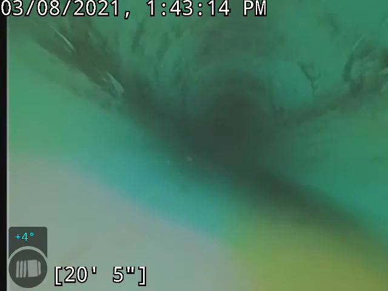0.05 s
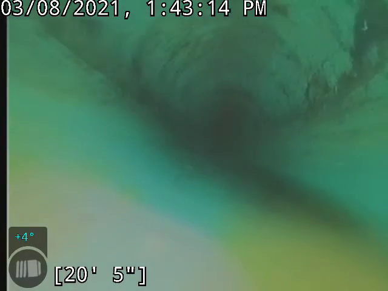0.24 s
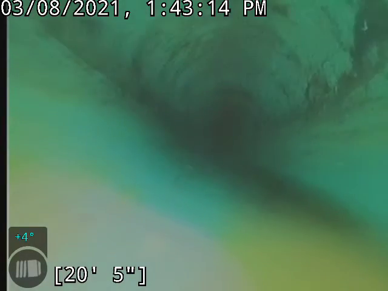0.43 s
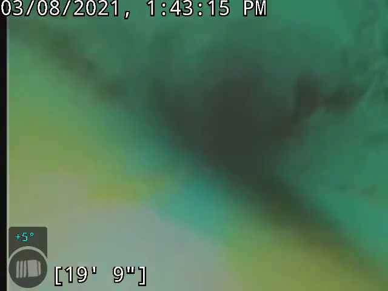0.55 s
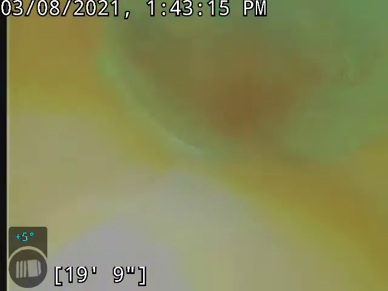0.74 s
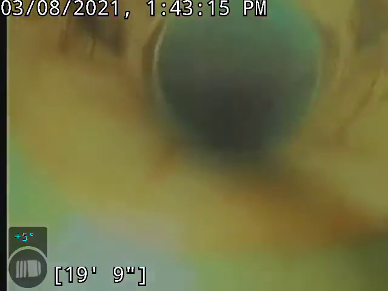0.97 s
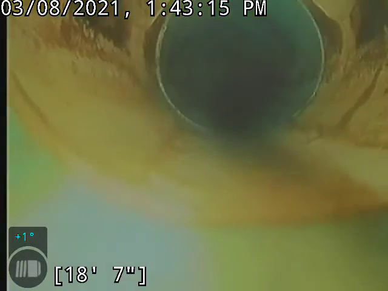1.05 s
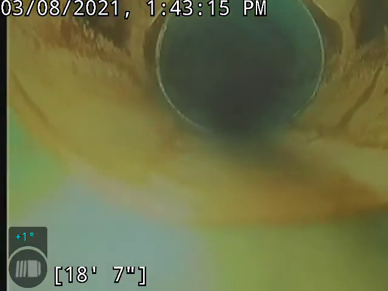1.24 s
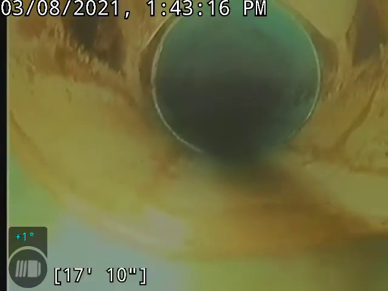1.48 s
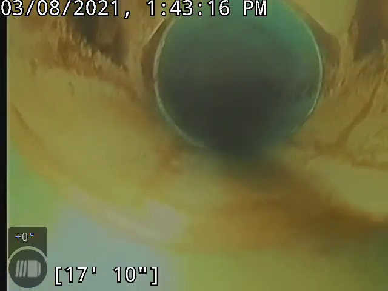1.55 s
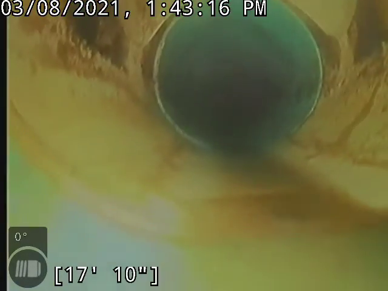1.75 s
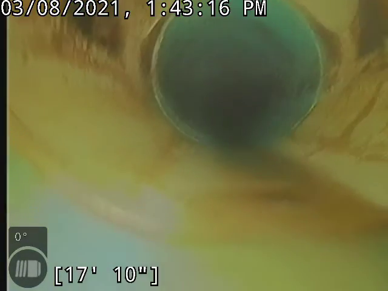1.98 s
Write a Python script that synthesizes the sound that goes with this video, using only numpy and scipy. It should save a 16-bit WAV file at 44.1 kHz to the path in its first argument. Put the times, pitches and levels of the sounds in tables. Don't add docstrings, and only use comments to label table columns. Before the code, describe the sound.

A stiff drain cable is hauled back and coiled into a hollow reel, close in a small hard room. Low jolts, light rattle and taps run over a faint deep hum; a glove hiss swells at 0.3-0.5 s. Coils knock at 0.49 s, hard, and 0.89 s, duller, then slap heavily with clattering rebounds at 1.28 and 1.69 s. A soft thud at 1.8 s, then movement fades towards 2 s.

```python
import sys
import numpy as np
from scipy import signal
from scipy.fft import rfft, irfft, next_fast_len
from scipy.io import wavfile
from scipy.ndimage import uniform_filter1d, map_coordinates

SR = 44100
rng = np.random.default_rng(int(sys.argv[2]) if len(sys.argv) > 2 else 0)


def wav_out(sig):
    wavfile.write(sys.argv[1], SR, np.round(np.clip(np.atleast_2d(sig).T, -1, 1) * 32767).astype(np.int16))


def makeup_ratio(level_db):
    decades = np.asarray(level_db, float) / 20
    return 10 ** decades


N = 88817

# time_s, level_db
SLIDE = [(0, -67), (.265, -65), (.3, -47), (.43, -42.5), (.47, -50), (.52, -49), (.58, -57), (.85, -57.5),
         (.93, -61.5), (1.04, -56), (1.16, -66.5), (1.26, -65), (1.31, -55.5), (1.55, -57.5), (1.72, -59.5),
         (1.85, -63), (1.92, -75.5), (2.01, -82)]
# freq_hz, density_db (per Hz)
HISS = [(5000, -40), (7000, -16), (8900, -4.5), (10500, -2), (12300, 1), (13800, -0.5)]
# freq_hz, density_db (per Hz)
RUB = [(900, -27), (1500, 2), (3200, -9), (5300, -4.5), (7000, -9.5), (9000, -21)]
# time_s, jolt_db, rattle_db
REEL = [(0, -41.5, -51.5), (.12, -51.5, -56.5), (.25, -47.5, -58), (.3, -46.5, -64.5), (.42, -46.5, -54),
        (.53, -48, -52.5), (.6, -43.5, -53), (.72, -46, -53), (.86, -48, -57), (.95, -42.5, -53.5),
        (1.05, -47.5, -52), (1.12, -52, -61), (1.26, -51, -57), (1.42, -57.5, -82), (1.62, -55.5, -67),
        (1.76, -49, -62), (1.9, -52.5, -65), (2.01, -58, -79)]
# freq_hz, width_hz, level_db
JOLT_PEAKS = [(83.6, 27.7, 0.5), (128.3, 46, 0), (197.6, 20.6, -5.5), (269, 109, -8.5), (424, 170, -13)]
# freq_hz, width_hz, level_db
RATTLE_PEAKS = [(437, 89, -5.5), (745, 73, 0), (911, 48, 0), (1078, 71, -6), (1500, 397, -14.5),
                (2550, 770, -18.5), (5200, 2600, -32)]
# start_s, peak_db, thud_db (over peak), crack_db (over peak), panel_hz
KNOCKS = [
    (0.4872, -28.5, 1.5, -3.5, 1710),
    (0.8946, -29, -4.5, -35, 945),
    (1.2794, -23, -21, -13, 885),
    (1.6873, -24, -13, -9.5, 683),
    (1.7987, -42, -13, -34, 800),
]
# start_s, peak_db, thud_db (over peak), panel_hz
REBOUNDS = [(0.4896, -22.5, -23.5, 803), (0.4993, -28.5, -3, 740), (.527, -43, -27, 860),
            (.535, -36.5, -26, 1090), (.903, -37, 7, 820), (.927, -38, -12, 900), (1.2815, -28.5, -16, 914),
            (1.2857, -25.5, -14, 1044), (1.291, -29, -20, 1294), (1.299, -27.5, -29, 368),
            (1.307, -32, -30, 494), (1.321, -33, -15, 470), (1.3225, -39.5, -36, 1500),
            (1.329, -34, -12, 513), (1.345, -39, -19, 447), (1.678, -40, -6, 800), (1.692, -24.5, -14, 702),
            (1.701, -26, -8.5, 726), (1.704, -32, -22, 930), (1.715, -25.5, -28, 422),
            (1.727, -44, -14, 653), (1.739, -47, -21, 760), (1.752, -38.5, -15, 690),
            (1.817, -41, -28, 690)]
# start_s, peak_db, thud_db (over peak), crack_db (over peak), panel_hz
TAPS = [(0.016, -41, -26, -20, 1230), (0.084, -37, -31, -39, 765), (0.311, -51, 10.5, -26, 822),
        (0.438, -37.5, 1, -14, 810), (0.739, -37.5, -16, -37, 810), (0.802, -47.5, -4, -0.5, 815),
        (0.978, -42.5, 4.5, -23, 810), (1.052, -47.5, 7.5, 10, 810), (1.062, -46, -26, 2, 780),
        (1.188, -42.5, -14, -40, 960), (1.245, -48, -22, -30, 930), (1.595, -49.5, 2.5, -3, 830),
        (1.663, -51, -11, -26, 830)]
# start_s, level_db
TICKS = [
    (1.0532, -41),
    (1.2793, -33.5),
    (1.688, -44.5),
]
# freq_hz, level_db, t60_s
SHELL = [(470, -4.5, 0.025), (685, -3, 0.025), (964, 5, 0.012), (1308, -4, 0.014), (1690, -3.5, 0.023),
         (2060, -16, 0.026), (2611, -14, 0.039), (3570, -24, 0.015)]
# freq_hz, level_db, t60_s
FRAME = [(130, -10, 0.11), (180.6, 0, 0.13), (260, -3.5, 0.054), (321.3, 1.5, 0.09), (403, -4, 0.033)]
# freq_hz, density_db (per Hz)
CRACK = [(1500, 9), (2500, 5), (4500, 1), (6500, -10), (8500, -55)]
# freq_hz, width_hz, level_db
SCRAPE_PEAKS = [(254, 50, 4.5), (442, 257, 2), (800, 780, -7.5), (1500, 230, -6.5), (2400, 320, -13),
                (4860, 3400, -29.5)]
# start_s, peak_db, pitch_hz
THUMPS = [(0.012, -40, 230), (0.161, -42, 115), (0.2, -46, 297), (0.229, -41, 79), (0.303, -31, 106.3),
          (0.364, -33, 100), (0.4911, -30, 258), (0.506, -36, 240), (0.529, -36, 192), (0.573, -31.5, 130),
          (0.599, -28, 142), (0.675, -42, 99), (0.741, -28.5, 432), (0.802, -40.5, 101), (.904, -32, 200),
          (.919, -28.5, 193), (0.94, -32, 102), (1.031, -38, 107), (1.065, -30.5, 165), (1.187, -36, 400),
          (1.205, -37.5, 307), (1.279, -23.5, 345), (1.287, -24, 455), (1.296, -29, 296), (1.664, -32, 317),
          (1.689, -22, 302), (1.697, -26.5, 193), (1.727, -26, 296), (1.737, -33, 190), (1.772, -39, 290),
          (1.799, -27.5, 340), (1.8048, -23.5, 169.7), (1.805, -23.5, 310), (1.817, -32, 260),
          (1.834, -35.5, 130), (1.864, -42, 120.6), (1.88, -41, 188), (1.93, -41, 181), (1.97, -42, 175)]
# freq_hz, t60_s
ROOM = [(200, 0.28), (1000, 0.28), (3000, 0.43), (10000, 0.31)]
# freq_hz, density_db (per Hz)
HUM = [(12, -35), (20, 3), (80, -3), (113, -31), (157, -3), (260, -22.5), (561, -31.5), (2000, -40.5),
       (2600, -112), (4400, -120)]

RUB_DB, RUB_GROWS = -12.5, 0.69
JOLTS_PER_S, JOLT_SPREAD_DB = 300, 2
RATTLES_PER_S, RATTLE_SPREAD_DB = 1500, -0.5
SHELL_DB, PANEL_DB, PANEL_T60_S = -6, 5, 0.03
THUD_DB, THUD_LAG_S = -5, 0.00553
CRACK_DB, CRACK_T60_S = 1.5, 0.017
CHATTER_S, CHATTER_DB = 0.005006, -1.5
REBOUND_SHELL_DB, REBOUND_CRACK_DB = -4.5, -18
SCRAPE_DB, SCRAPE_T60_S = -14, 0.2
TAP_DB, TAP_SPREAD_S, TICK_T60_S = -1, 0.011, 0.022
THUMP_CYCLES, THUMP_ATTACK_S = 10.4, 0.0032
ROOM_DB, HUM_DB = -10, -52.5
LIMIT, KNEE = 0.09, 4
NOTCH_HZ, NOTCH_WIDTH_HZ, NOTCH_DEPTH = 7980, 1010, 0.51
TOP_HZ = 13900


def unit(x):
    return x / np.sqrt(np.mean(x ** 2) + 1e-20)


def along(points, hz):
    f, v = np.transpose(points)
    return np.interp(np.log(hz + 1), np.log(f + 1), v)


def curves(rows):
    s, *cols = np.transpose(rows)
    return [np.interp(np.arange(N) / SR, s, c) for c in cols]


def wobble(rate):
    knots = rng.standard_normal(int(N * rate / SR) + 4)
    return map_coordinates(knots, [np.arange(N) * rate / SR])


def filtered(x, response):
    m = next_fast_len(len(x) + SR // 2)
    return irfft(rfft(x, m) * response(np.fft.rfftfreq(m, 1 / SR)), m)[:len(x)]


def rush(spectrum, patchy_db):
    z = signal.stft(rng.standard_normal(N), nperseg=256)[2]
    field = uniform_filter1d(rng.standard_normal(z.shape), 8, 0)
    field = uniform_filter1d(field, 8, 1)
    x = signal.istft(z * makeup_ratio(patchy_db * unit(field)), nperseg=256)[1][:N]
    return unit(filtered(x, lambda hz: makeup_ratio(along(spectrum, hz))))


def puff(spectrum, t, t60):
    noise = filtered(rng.standard_normal(len(t)), lambda hz: makeup_ratio(along(spectrum, hz)))
    return unit(noise) * makeup_ratio(-60 * t / t60)


def shaken(peaks, rate, spread_db):
    chance, size, sign = rng.random((3, N))
    hits = (chance < rate / SR) * makeup_ratio(-spread_db * np.log(size + 1e-9)) * np.sign(sign - 0.5)

    def body(f):
        total = 0
        for k, (centre, width, db) in enumerate(peaks):
            band = 1j * f * width
            total = total + (-1) ** k * makeup_ratio(db) * band / (centre ** 2 - f * f + band)
        return total

    return unit(filtered(hits, body))


def ring(modes, t, attack_s, detune):
    swing = rng.standard_normal((len(modes), 2))
    tones = 0
    for k, (hz, db, t60) in enumerate(modes):
        level = makeup_ratio(db + 2 * swing[k, 0] - 60 * t / t60)
        pitch_hz = hz * (1 + detune * swing[k, 1])
        tones = tones + (-1) ** k * level * np.sin(2 * np.pi * pitch_hz * t)
    return tones * (1 - np.exp(-t / attack_s))


def glove():
    level_db, = curves(SLIDE)
    hiss = makeup_ratio(level_db + 0.4 * wobble(14)) * rush(HISS, patchy_db=1.2)
    mean_db = level_db.mean()
    rub_db = mean_db + RUB_GROWS * (level_db - mean_db) + RUB_DB
    return hiss + makeup_ratio(rub_db) * rush(RUB, patchy_db=1.5)


def reel():
    jolt_db, rattle_db = curves(REEL)
    lumps = wobble(22.76)
    jolts = makeup_ratio(jolt_db + 1.36 * lumps) * shaken(JOLT_PEAKS, JOLTS_PER_S, JOLT_SPREAD_DB)
    rattle_gain = makeup_ratio(rattle_db + 2.2 * lumps + 0.67 * wobble(29.8))
    return jolts + rattle_gain * shaken(RATTLE_PEAKS, RATTLES_PER_S, RATTLE_SPREAD_DB)


def blow(db, thud_db, crack_db, contacts, panel_hz):
    t = np.arange(SR // 4) / SR

    def late(x, s):
        return np.pad(x, (round(max(s, 0) * SR), 0))[:len(t)]

    shell = sum(late(makeup_ratio(level) * ring(SHELL, t, 0.0006, detune=0.035), s) for s, level in contacts)
    panel = makeup_ratio(PANEL_DB - 60 * t / PANEL_T60_S) * np.sin(2 * np.pi * panel_hz * t)
    shell = shell + panel * (1 - np.exp(-t / 0.00067))
    thud = late(ring(FRAME, t, 0.0025, detune=0.046), THUD_LAG_S)
    crack = puff(CRACK, t, CRACK_T60_S) * (1 - np.exp(-t / 0.00055))
    mix = makeup_ratio(SHELL_DB) * shell + makeup_ratio(THUD_DB + thud_db) * thud + makeup_ratio(CRACK_DB + crack_db) * crack
    return makeup_ratio(db) * mix


def knocks():
    out, rubbing = np.zeros(N + SR), np.zeros(N + SR)
    t = np.arange(SR // 4) / SR
    sounds = []
    for s, db, thud_db, hz in REBOUNDS:
        sounds.append((s, blow(db, thud_db, REBOUND_CRACK_DB, [(0.0015, REBOUND_SHELL_DB)], hz)))
    for s, db in TICKS:
        sounds.append((s, makeup_ratio(db) * puff(HISS, t, TICK_T60_S)))
    for s, db, thud_db, crack_db, hz in KNOCKS:
        contacts = [(0, 0), (CHATTER_S * rng.random(), CHATTER_DB)]
        sounds.append((s, blow(db, thud_db, crack_db, contacts, hz)))
        rubbing[round(s * SR):][:len(t)] += makeup_ratio(db + SCRAPE_DB - 60 * t / SCRAPE_T60_S)
    for s, db, thud_db, crack_db, hz in TAPS:
        contacts = [(0.0013, 0)] + [(TAP_SPREAD_S * u, -4) for u in rng.random(3)]
        sounds.append((s, blow(db + TAP_DB, thud_db, crack_db, contacts, hz)))
    for s, x in sounds:
        out[round(s * SR):][:len(x)] += x
    return out[:N] + rubbing[:N] * shaken(SCRAPE_PEAKS, RATTLES_PER_S, RATTLE_SPREAD_DB)


def thumps():
    out, t = np.zeros(N + SR), np.arange(SR // 4) / SR
    for s, db, hz in THUMPS:
        tone = ring([(hz, db, THUMP_CYCLES / hz)], t, THUMP_ATTACK_S, detune=0)
        out[round(s * SR):][:len(t)] += tone
    return out[:N]


def room(x):
    out, step = np.zeros(N + 2 * SR), SR // 3
    for start in range(0, N, step):
        hz, t, z = signal.stft(rng.standard_normal(SR // 2), SR, nperseg=256)
        fade = makeup_ratio(-60 * t / along(ROOM, hz)[:, None])
        tail = signal.istft(z * fade, SR, nperseg=256)[1]
        wet = signal.fftconvolve(x[start:start + step], tail / np.linalg.norm(tail))
        out[start + 200:][:len(wet)] += wet
    return out[:N]


def hum():
    return makeup_ratio(HUM_DB + 1.2 * wobble(6)) * rush(HUM, patchy_db=1.1)


def scene():
    hits = knocks() + thumps()
    return (hits + makeup_ratio(ROOM_DB) * room(hits) + reel() + glove() + hum())[None]


def top_cut(x):
    return signal.sosfilt(signal.butter(12, 14000, fs=SR, output="sos"), x)


def record(dry):
    def treble_dip(hz):
        dip = NOTCH_DEPTH * np.exp(-((hz - NOTCH_HZ) / NOTCH_WIDTH_HZ) ** 2)
        return (1 - dip) * (hz < TOP_HZ)

    limited = dry[0] / (1 + abs(dry[0] / LIMIT) ** KNEE) ** (1 / KNEE)
    mix = filtered(limited, treble_dip)[None]
    return top_cut(mix)


dry = scene()
out = record(dry)
wav_out(out)
```